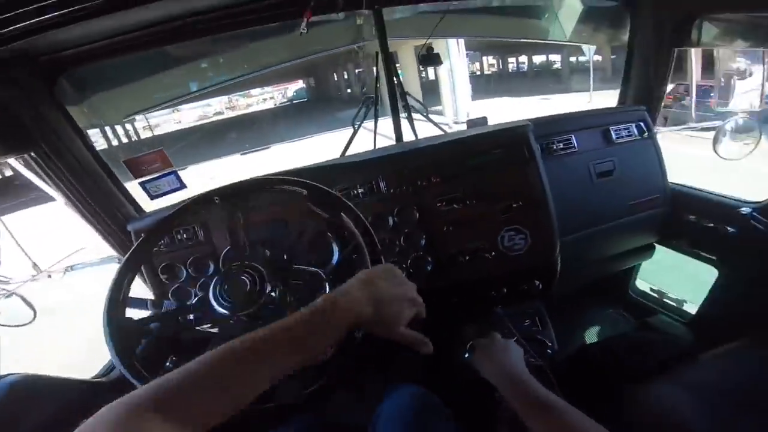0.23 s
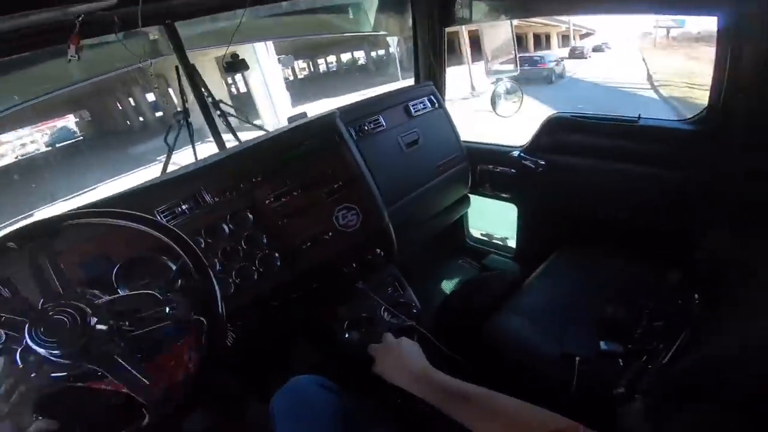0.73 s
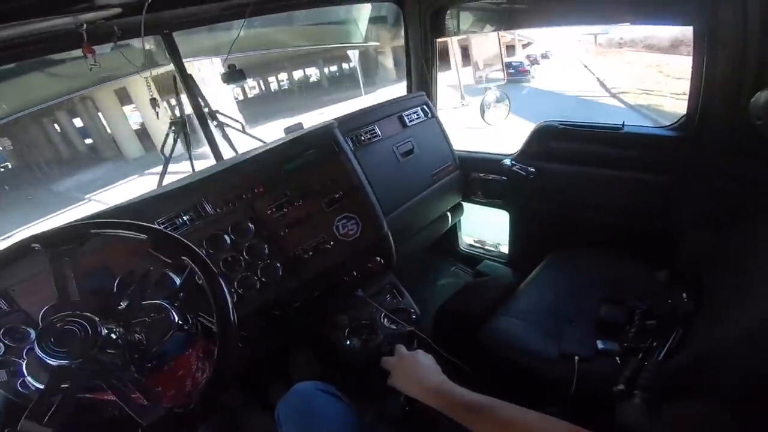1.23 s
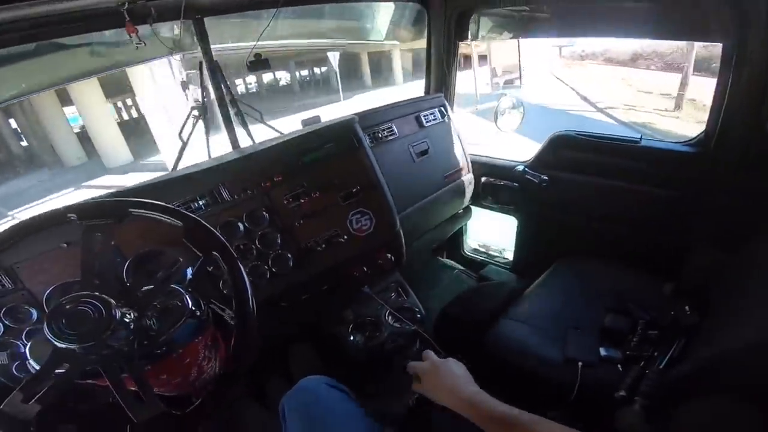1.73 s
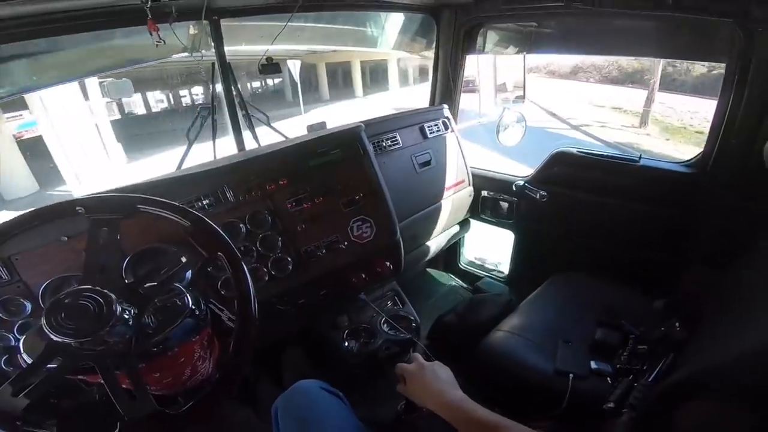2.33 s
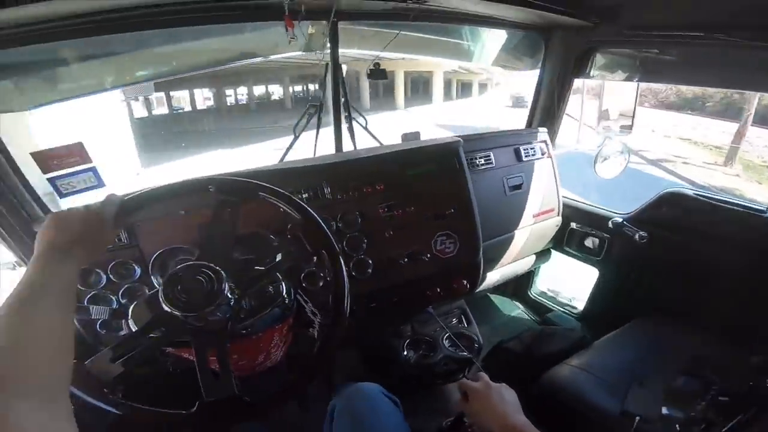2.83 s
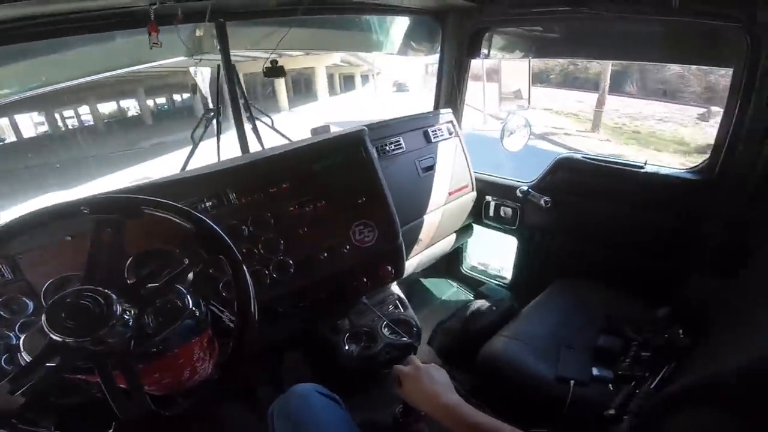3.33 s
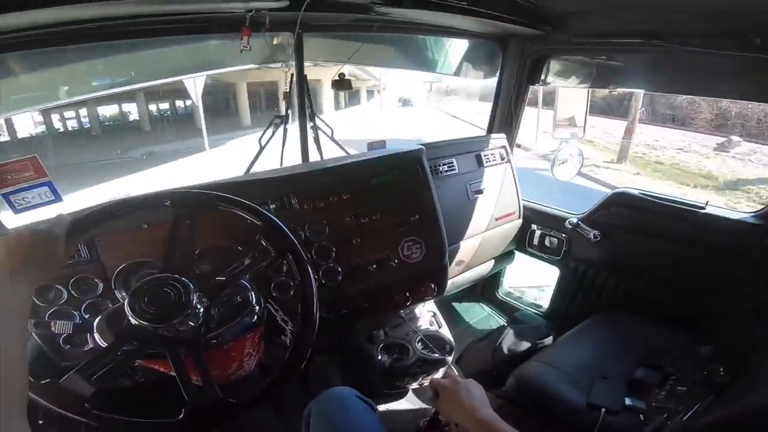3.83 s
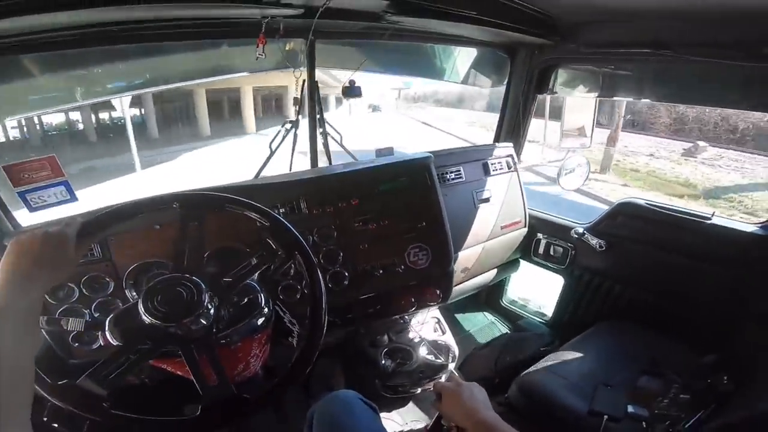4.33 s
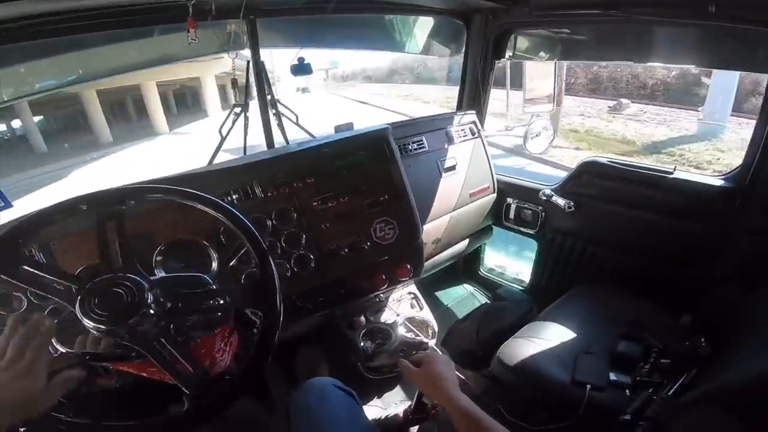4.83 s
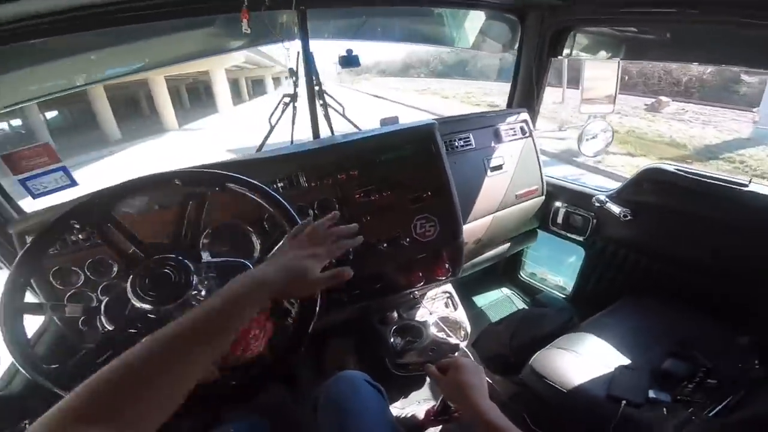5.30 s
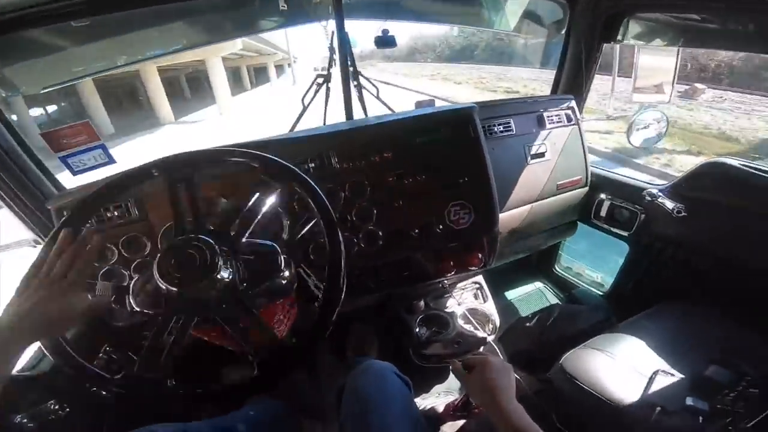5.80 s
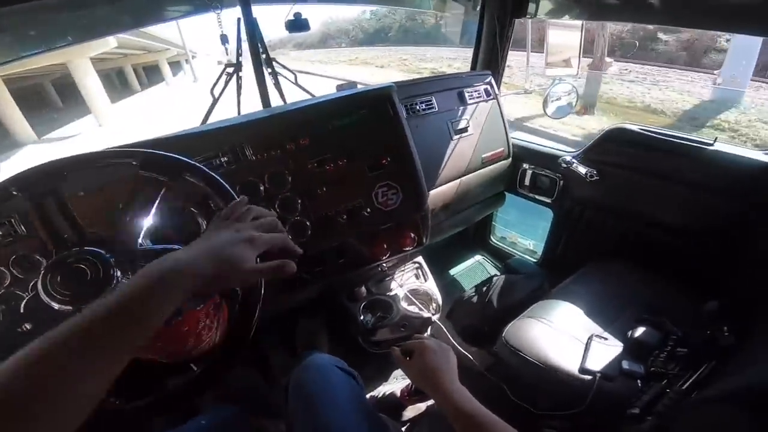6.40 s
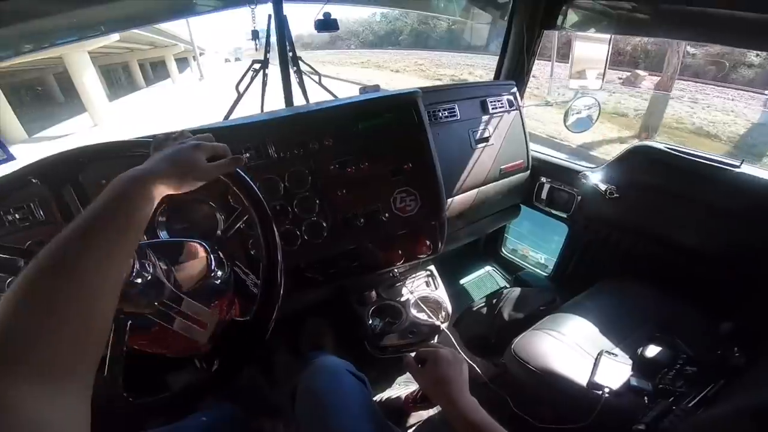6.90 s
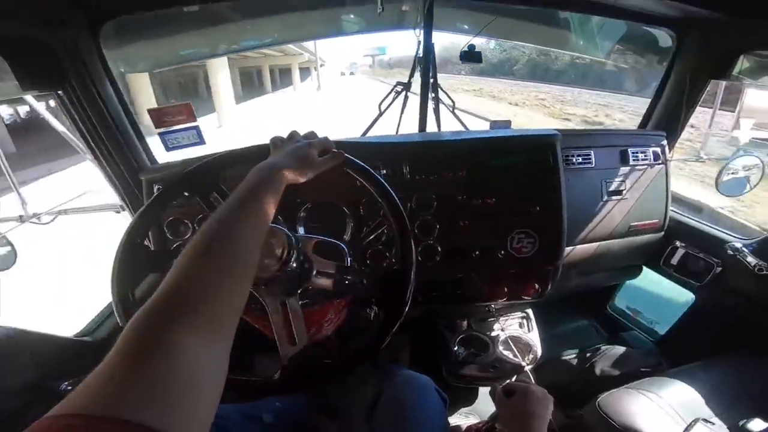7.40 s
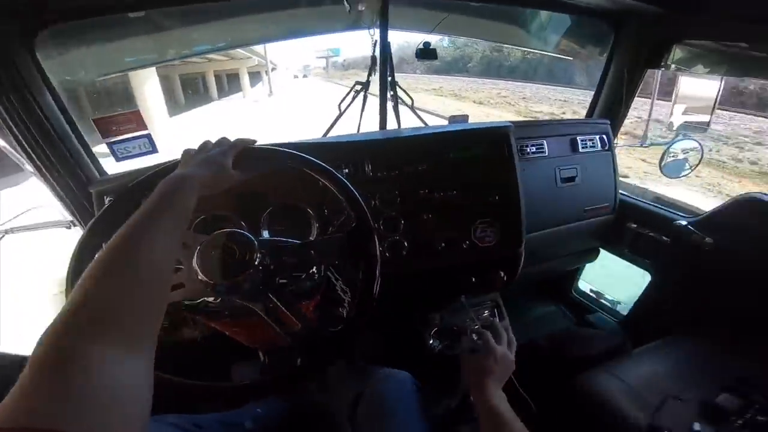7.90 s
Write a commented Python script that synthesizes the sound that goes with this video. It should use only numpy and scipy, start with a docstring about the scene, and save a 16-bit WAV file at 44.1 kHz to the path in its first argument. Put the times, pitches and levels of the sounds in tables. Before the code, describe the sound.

Deep diesel droning and clattering fills a truck cab, with shift air puffs, small trim squeaks and a turbo whistle rising under acceleration.

```python
"""The firing drone of a six-cylinder diesel truck, heard inside the cab as it pulls away from walking pace.
Tones locked to the engine angle are coloured by the cab; they drop out at each gear change.
Around them coloured noise makes the block clatter, its hiss and a road rumble; narrow noise bands make
ringing panels, a closing low engine hum and a turbocharger whistle that mostly rises. Noise bursts give
puffs of shift air, and short sine tones give squeaks of loose trim."""
import sys
import numpy as np
from scipy import signal
from scipy.fft import rfft, irfft, next_fast_len
from scipy.io import wavfile
from scipy.ndimage import uniform_filter1d

SR = 44100
rng = np.random.default_rng(int(sys.argv[2]) if len(sys.argv) > 2 else 0)


def wav_out(sig):
    """Save sig, one row per channel (or a flat mono array), as 16-bit PCM at SR to the path in sys.argv[1]."""
    wavfile.write(sys.argv[1], SR, np.round(np.clip(np.atleast_2d(sig).T, -1, 1) * 32767).astype(np.int16))


N = 359415

# likeness of the two microphone ports: freq_hz, likeness (0 to 1)
PORT_LIKENESS = [(60, .7), (150, 0.96), (260, 1), (490, 0.98), (980, 0.19), (1980, 0.55), (3990, 0.64),
                 (9000, 0.14)]


def gain_of(db):
    """Turns decibels into an amplitude factor."""
    return 10 ** (np.asarray(db) / 20)


def evened(x):
    """Scales a signal to rms 1."""
    return x / np.sqrt(np.mean(x ** 2) + 1e-20)


def read(points, hz):
    """Reads a table over frequency, with straight lines on a log-frequency axis."""
    freq_hz, value = np.transpose(points)
    return np.interp(np.log(hz + 1), np.log(freq_hz + 1), value)


def curves(rows):
    """Draws each column of a time table as a line with one value a sample."""
    s, *columns = np.transpose(rows)
    return [np.interp(np.arange(N) / SR, s, column) for column in columns]


def wander(hz):
    """Random drift of rms 1: noise low-passed at hz on a coarse time grid, then interpolated."""
    step = max(int(SR / hz / 16), 1)  # samples between grid points
    low_pass = signal.butter(2, hz, fs=SR / step, output="sos")
    slow = signal.sosfilt(low_pass, rng.standard_normal(N // step + 2))
    return evened(np.interp(np.arange(N) / step, np.arange(len(slow)), slow))


def noise(db_of, patchy_db, size):
    """Two-port noise of rms 1 with a given colour, its level drifting in patches of time and pitch."""
    # level of the left port over the right: freq_hz, lean_db
    lean_points = [(60, 4), (320, -1.5), (1000, 5.5), (2200, 2), (4000, -0.5), (9000, 1)]
    # phase by which the left port leads: freq_hz, lead_rad
    lead_points = [(0, -0.75), (860, 0.018), (1380, 0.0047), (2150, -0.97), (4130, 0.14)]
    hz, frames = np.fft.rfftfreq(size, 1 / SR), 4 * N // size + 5
    a, b, c, d, patches = rng.standard_normal((frames, len(hz), 5)).T
    patches = uniform_filter1d(patches, size=5, axis=0)  # over frequency
    patches = evened(uniform_filter1d(patches, size=12, axis=1))  # over time
    same = np.clip(read(PORT_LIKENESS, hz), -1, 1)[:, None]
    left = a + 1j * b
    right = same * left + np.sqrt(1 - same ** 2) * (c + 1j * d)
    right = right * np.exp(-1j * read(lead_points, hz))[:, None]
    lean = gain_of(read(lean_points, hz) / 2)[:, None]
    colour = gain_of(db_of(hz)[:, None] + patchy_db * patches)
    spectra = np.array([left * lean, right / lean]) * colour
    return evened(signal.istft(spectra, nperseg=size, noverlap=3 * size // 4)[1][:, :N])


def band(hz, half_width_hz):
    """A narrow band of noise around the tone hz, partly alike at the two ports."""
    angle = 2 * np.pi * np.cumsum(hz * np.ones(N)) / SR
    same = np.clip(read(PORT_LIKENESS, np.mean(hz)), -1, 1)

    def strand():
        return wander(half_width_hz) * np.cos(angle) + wander(half_width_hz) * np.sin(angle)

    left, other = strand(), strand()
    return np.array([left, same * left + np.sqrt(1 - same ** 2) * other])


def rumble():
    """Tyres and frame shake the floor: patchy low noise with a changing level."""
    # colour of the floor rumble: freq_hz, relative density_db (per Hz)
    rumble_colour = [(15, -16), (36, 2), (60, -7.5), (85, -6), (120, 3), (170, -3), (240, 3), (290, -13),
                     (500, -53.5)]
    # its level along the way: time_s, level_db
    road_level = [(0, -32), (4.5, -32), (5.6, -30.5), (6.5, -35), (7.7, -34), (8.15, -29)]
    level_db, = curves(road_level)
    return gain_of(level_db) * noise(lambda hz: read(rumble_colour, hz), patchy_db=2.5, size=4096)


def turbo():
    """A breathy, flickering whistle around the blade tone, in a wide smear of hiss just above it."""
    # turbocharger: time_s, whistle_hz, level_db, upper_db (wide hiss against the whistle)
    turbo_course = [(.6, 3800, -58.5, -8), (2, 3660, -61, -9.5), (4.5, 3599, -57, -12),
                    (5.1, 3903, -55.5, -3), (5.65, 4446, -59, 2), (6.35, 4596, -64.5, 1),
                    (6.8, 5400, -66.5, 6.5), (7.3, 6200, -61.5, 1), (7.7, 6350, -63, -1.5),
                    (7.96, 5950, -59, -11), (8.15, 5790, -57, -14)]
    hz, db, upper_db = curves(turbo_course)
    upper_strand = 1.07  # times the blade tone
    lower = gain_of(1.5 * wander(8)) * band(hz + 60 * wander(10), half_width_hz=110)
    upper_hz = upper_strand * hz + 150 * wander(10)
    upper = gain_of(upper_db + 1.5 * wander(6)) * band(upper_hz, half_width_hz=480)
    return gain_of(db) * (lower + upper)


def puffs():
    """Bursts of valve air: two colours of noise with a quick rise and an exponential fall."""
    # puffs of shift air: start_s, level_db (of the fall, drawn back to its start), treble_db (against the low part)
    puff_rows = [(0.345, -40, -14), (0.4214, -54, 0), (0.6363, -49, -17), (0.6768, -48, -6),
                 (1.5904, -46, -29), (7.9576, -39.5, -12)]
    rise_s, t60_s = 0.0015, 0.09  # time constant of the rise; time to fall 60 dB
    t, out = np.arange(N) / SR, np.zeros((2, N))
    low = noise(lambda hz: -14 * abs(np.log2((hz + 1) / 4300)) ** 2, patchy_db=0, size=512)
    high = noise(lambda hz: -90 * abs(np.log2((hz + 1) / 8700)) ** 2, patchy_db=0, size=512)
    for start_s, level_db, treble_db in puff_rows:
        age = np.maximum(t - start_s, 0)
        envelope = gain_of(level_db - 60 * age / t60_s) * (1 - np.exp(-age / rise_s))
        out += envelope * (low + gain_of(treble_db) * high)
    return out


def squeaks():
    """Loose trim squeaks in short tones of slightly unsteady phase."""
    # single squeaks: middle_s, pitch_hz, level_db (rms at the middle, left port)
    squeak_rows = [(1.024, 1730, -38.5), (1.062, 1714, -39.5), (1.137, 1699, -38), (1.215, 1730, -41),
                   (1.568, 1940, -40), (2.089, 1665, -41.5), (2.899, 1640, -39), (3.64, 1640, -40.5),
                   (4.083, 1650, -38.5), (4.3, 1774, -40), (4.993, 1950, -39.5), (5.094, 1955, -38)]
    half_s, right_db = 0.012, 0.5  # half length to 1/e; right port over left
    t, out = np.arange(N) / SR, np.zeros(N)
    unsteady = .6 * wander(60)  # radians
    for middle_s, pitch_hz, level_db in squeak_rows:
        envelope = gain_of(level_db) * np.exp(-((t - middle_s) / half_s) ** 2)
        out += envelope * np.sin(2 * np.pi * pitch_hz * t + unsteady)
    return np.sqrt(2) * out * gain_of([[0], [right_db]])


def swells():
    """Panel resonances ring out, a low engine hum swells at the end, and a band of turbo hiss near 4.4 kHz
    closes the scene: flickering narrow noise bands."""
    # ringing panels, a closing engine hum near 110 Hz, and a closing band of turbo hiss near 4.4 kHz: #
    # middle_s, pitch_hz, level_db, half_s (half length to 1/e)
    swell_rows = [(0.248, 1905, -45.5, 0.15), (1.205, 1700, -47.5, 0.45), (2.804, 1628, -49.5, .93),
                  (4.656, 1990, -45, 0.3), (5.046, 1983, -40.5, 0.11), (6.006, 1886, -46, 0.49),
                  (6.85, 2122, -46.5, 0.48), (3.9, 359.6, -42.5, .5), (5.2, 349.8, -42, .55),
                  (8.05, 2550, -50, .1), (8.07, 3680, -51, 0.13), (7.197, 639, -43.5, .6),
                  (7.704, 1756, -46, .33), (7.902, 110.8, -24, 0.29), (8.07, 4400, -58, 0.13)]
    t, out = np.arange(N) / SR, np.zeros((2, N))
    for middle_s, pitch_hz, level_db, half_s in swell_rows:
        flickering = gain_of(3 * wander(30)) * band(pitch_hz, half_width_hz=.075 * pitch_hz)
        out += gain_of(level_db) * np.exp(-((t - middle_s) / half_s) ** 2) * flickering
    return out


def knocks(angle, db_of):
    """Valves, injectors and gears strike in the same order every six firings: fine lines follow the speed."""
    shared, *own = rng.standard_normal((3, 2, 1024))  # two patterns a port
    strong = gain_of(2.5 * np.minimum(rng.exponential(1, (2, 513)), 2.5))  # a few orders stand out
    patterns = [irfft(rfft(shared + 0.52 * o) * strong) for o in own]
    # radians: one pattern slowly gives way to the other
    drift = rng.random() + np.arange(N) / SR * .9 + .3 * wander(2)
    shares = np.cos(drift), np.sin(drift)
    place = (angle / (12 * np.pi) + .0003 * wander(6)) % 1 * 1024
    struck = np.array([
        sum(share * np.interp(place, np.arange(1024), pattern, period=1024)
            for share, pattern in zip(shares, port))
        for port in patterns])
    size = next_fast_len(N)
    colour = gain_of(db_of(np.fft.rfftfreq(size, 1 / SR)))
    return evened(irfft(rfft(struck, size) * colour, size)[:, :N])


def clatter(angle):
    """Block noise rings the panels and swells a little at each firing; knocks and a smooth hiss join it."""
    # levels along the way: time_s, clatter_db (of the noise, before knocks join), hiss_db
    clatter_level = [(0, -32.5, -55), (.72, -35, -59), (1.62, -33, -57), (1.88, -35.5, -59),
                     (4.69, -32.5, -56.5), (5.41, -30, -54), (6.53, -33.5, -55.5), (7.6, -30.5, -54),
                     (7.93, -32.5, -55.5), (8, -31.5, -52), (8.15, -31, -51)]
    # clatter through the firewall and panels: freq_hz, relative density_db (per Hz)
    panel_colour = [(200, -5.5), (350, -4.5), (470, -10), (780, -10), (1300, -10.5), (2300, -18),
                    (3600, -23.5), (4200, -35), (12000, -92.5)]
    # panel resonances: freq_hz, width_hz, lift_db
    panel_rings = [(364, 96, 2.5), (532.5, 34.6, 8.5), (634, 55, 9.5), (702, 40, 5.5), (866, 41, 7.5),
                   (999, 83, 5), (1163, 76, 4.5), (1880, 230, 3.5), (2217, 49, 4.5), (3030, 360, 5.5),
                   (3500, 260, 1.5)]
    # air hiss of intake and fan: freq_hz, relative density_db (per Hz)
    hiss_colour = [(2500, -28.5), (4300, 0), (6200, -4.5), (8000, -10.5), (8700, -17), (9900, -14.5),
                   (11200, -42), (14500, -43.5)]
    knocks_fade_hz = 1100  # above it the repeating knocks sink into the noise

    def rung_db(hz):
        lifts = sum(db / (1 + (2 * (hz - f) / width) ** 2) for f, width, db in panel_rings)
        return read(panel_colour, hz) + lifts

    def knocks_db(hz):
        return rung_db(hz) - 7 / (1 + (knocks_fade_hz / (hz + 1)) ** 4)

    level_db, hiss_db = curves(clatter_level)
    beat = 1 + .08 * np.cos(angle) + .03 * np.cos(2 * angle)
    block = beat * noise(rung_db, patchy_db=2.0, size=2048)
    block += gain_of(-.4) * knocks(angle, knocks_db)
    hiss = noise(lambda hz: read(hiss_colour, hz), patchy_db=.6, size=512)
    return gain_of(level_db) * block + gain_of(hiss_db) * hiss


def pedal():
    """The driver's foot: fuel and overtone settings, held between moves and eased over each move."""
    # moves of the pedal: time_s, fuel_db, second_db (lift of all overtones from the second up),
    # step_db (gained by each overtone after the second)
    pedal_moves = [(0, -21, -1.5, -5), (.4, -27, 0, -3), (.68, -30, -7, 6), (.85, -23, 1, -4.5),
                   (1.47, -19, -5.5, 1), (1.79, -30, 6.5, -1.5), (1.96, -22, 0, -0.3),
                   (4.9, -20.5, -2, 0.75), (6.5, -21, -3, 2), (7.7, -23, -3.5, 1.5), (7.97, -33.5, 5, 3)]
    move_s = .04  # time a move takes
    s, *columns = np.transpose(pedal_moves)
    row = np.searchsorted(s, np.arange(N) / SR, side="right") - 1
    width = max(round(move_s * SR), 1)
    return [uniform_filter1d(column[row], width, mode="nearest") for column in columns]


def drone(hz, angle):
    """The firing tone and its overtones, each coloured by the cab; weak crank tones lie between."""
    # overtones of the firing: multiple, level_db (against the firing tone, before pedal and cab)
    overtones = [(2, 3), (3, 1.5), (4, -6)]
    # tones of unlike cylinders and the turning crank: count (sixths of the firing rate),
    # level_db (at 60 Hz firing, before cab and coasting), slope_db (gained per Hz of firing rate)
    crank_tones = [(2.02, -49, -0.74), (3.03, -61, 0.86), (5.1, -53, 0.43), (6.99, -46.5, 0),
                   (8.07, -49.5, 0), (8.96, -37.5, -0.06), (10, -43, 0.62), (11.01, -33, -0.66),
                   (13, -40, 0), (14.02, -37.5, 0.18), (15.14, -37.5, -0.32), (16.04, -38.5, 0.23),
                   (16.95, -36, -0.34), (18.96, -34.5, 0), (20.08, -30.5, 0.4), (21.14, -29.5, -0.06),
                   (21.84, -33.5, -0.06), (27.17, -34, 0.25), (31.94, -35, -0.56), (36, -34, -0.06),
                   (41.87, -32.5, 0.02), (52.8, -42, 0.79)]
    # how the cab answers low tones: freq_hz, answer_db
    cab = [(45, 10.5), (57, 1.5), (64, 7.5), (76, 7), (100, -4), (112, 2), (124, -6), (150, -2.5),
           (160, -9.5), (180, -2), (198, -16), (222, -6.5), (250, -12), (300, -17), (400, -17)]
    boom_hz, boom_width_hz = 67, 3  # the boom of the cab delays tones near it
    coast_below_db = -26  # fuel level around which coasting sets in
    coast_flutter_db, coast_crank_db = 1.3, 1.5  # per unit of coasting

    fuel_db, second_db, step_db = pedal()
    coasting = 1 / (0.5 + np.exp(fuel_db - coast_below_db))  # 0 on the pedal, up to 2 off it
    # off the pedal the firing tone flutters and the crank tones come forward
    flutter_db = .5 + coast_flutter_db * coasting
    lag = np.arctan((hz - boom_hz) / boom_width_hz) / 2 + 2  # halved: partly masked by the direct sound
    firing_db = fuel_db + read(cab, hz) + flutter_db * wander(31)
    out = gain_of(firing_db) * np.sin(angle - lag)

    steep = .9  # radians: the higher overtones line up on the steep fall of each pulse
    for k, db in overtones:
        uneven_db, slip = .45 * wander(14), .05 * wander(14)
        level_db = fuel_db + db + second_db + (k - 2) * step_db + read(cab, k * hz) + uneven_db
        out += gain_of(level_db) * np.sin(k * angle + steep * (k - 2) + slip)

    for count, db, slope_db in crank_tones:
        turn = count * angle / 6 + 2 * np.pi * rng.random()
        level_db = db + slope_db * (hz - 60) + coast_crank_db * coasting
        level_db = level_db + read(cab, count * hz / 6) + 1.4 * wander(3)
        out += gain_of(level_db) * np.cos(turn)
    return np.sqrt(2) * out  # levels are rms


def scene():
    """One engine angle drives drone and clatter; the drone is the same at both ports."""
    # engine speed: time_s, firing_hz
    engine_speed = [(0, 63.56), (.34, 61.9), (.47, 59.57), (.72, 51.9), (.9, 50.72), (1.43, 54.73),
                    (1.74, 60.47), (1.83, 59.8), (1.99, 52.86), (2.4, 56.77), (3.16, 57.05), (4.3, 55.48),
                    (5.02, 58.3), (5.97, 64.34), (6.69, 70.47), (7.69, 77.26), (7.9, 76), (8.15, 64.9)]
    hz, = curves(engine_speed)
    angle = 2 * np.pi * np.cumsum(hz) / SR  # one turn a firing
    background = rumble() + turbo() + puffs() + squeaks() + swells()
    return background + clatter(angle) + drone(hz, angle)


def record(dry):
    """The microphone loses the top treble; then a steep low-pass is the band limit of the recorder."""
    edge_hz = 15000
    microphone = signal.firwin2(255, [0, 10300, 11300, SR / 2], gain_of([0, 0, -15, -15]), fs=SR)
    edge = signal.firwin(511, edge_hz, window=("kaiser", 9), fs=SR)
    return signal.oaconvolve(dry, np.convolve(microphone, edge)[None], "same")


dry = scene()
out = record(dry)
wav_out(out)
```